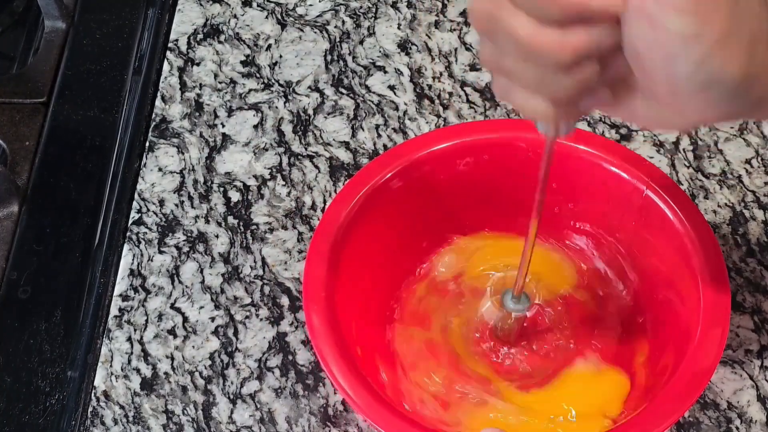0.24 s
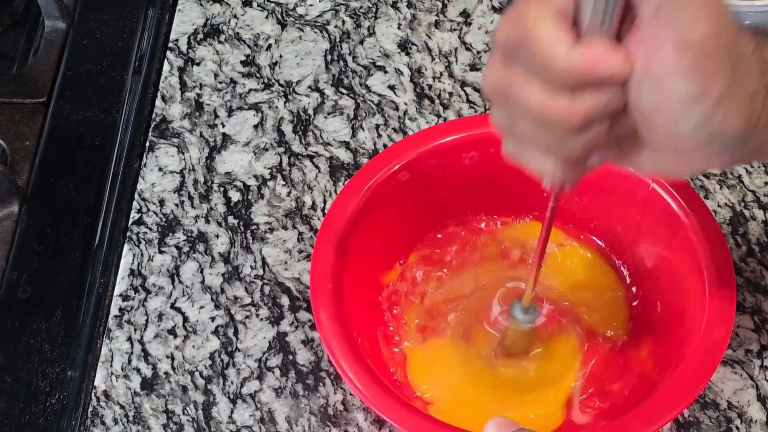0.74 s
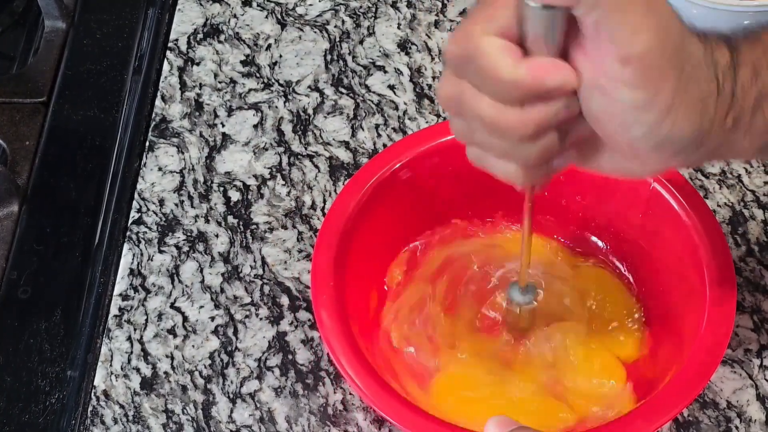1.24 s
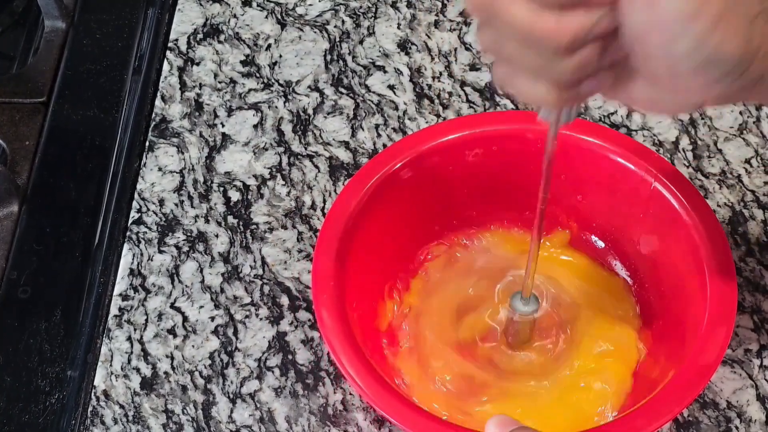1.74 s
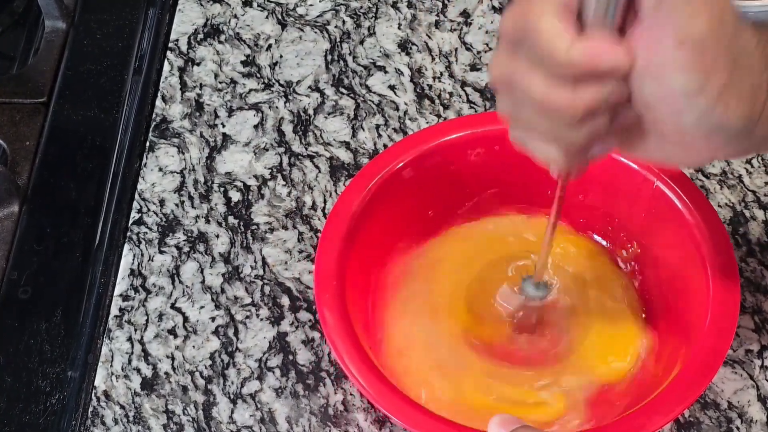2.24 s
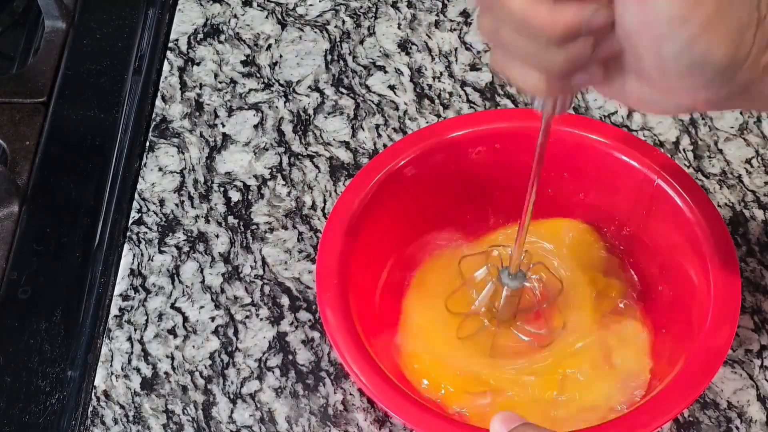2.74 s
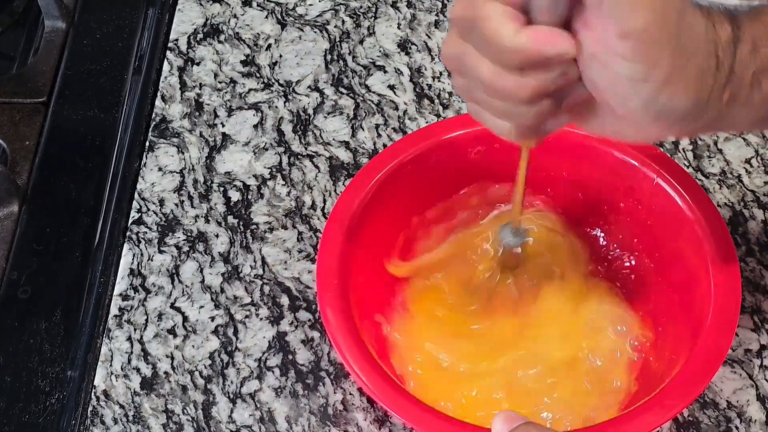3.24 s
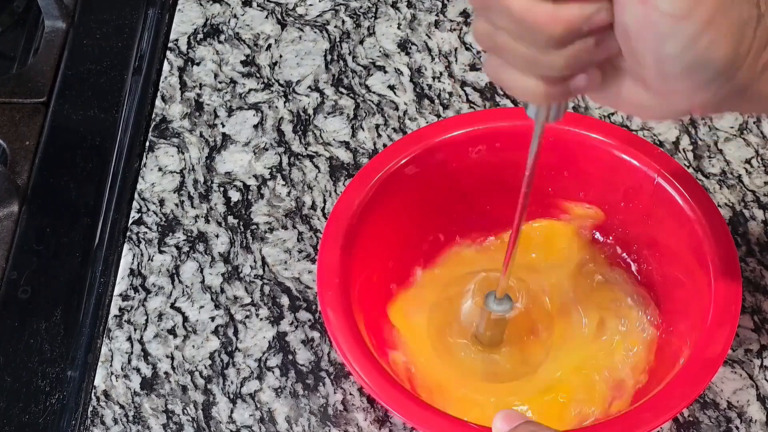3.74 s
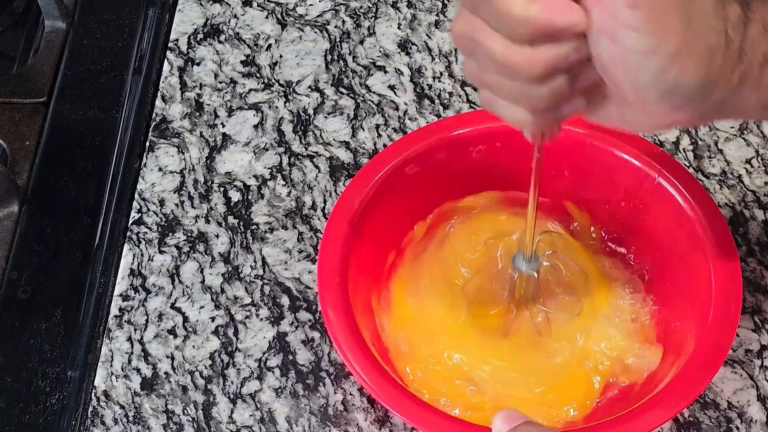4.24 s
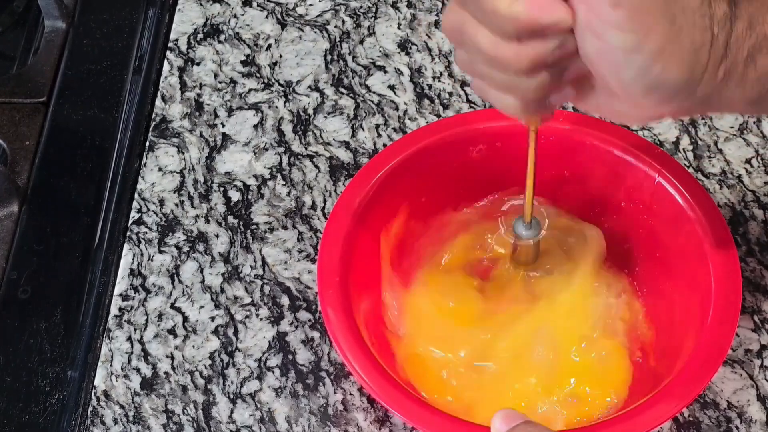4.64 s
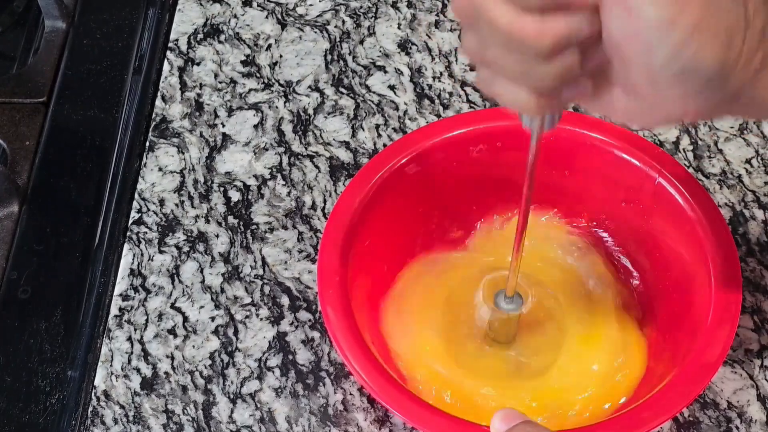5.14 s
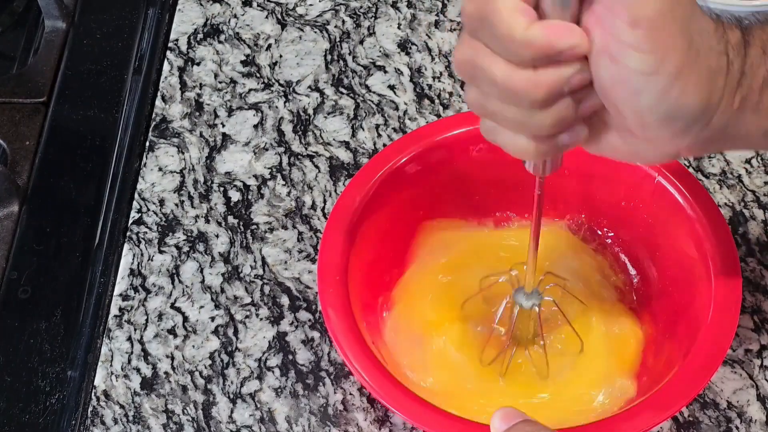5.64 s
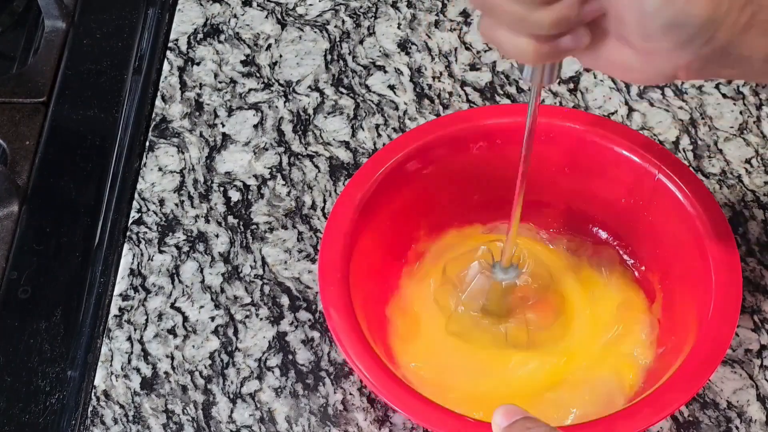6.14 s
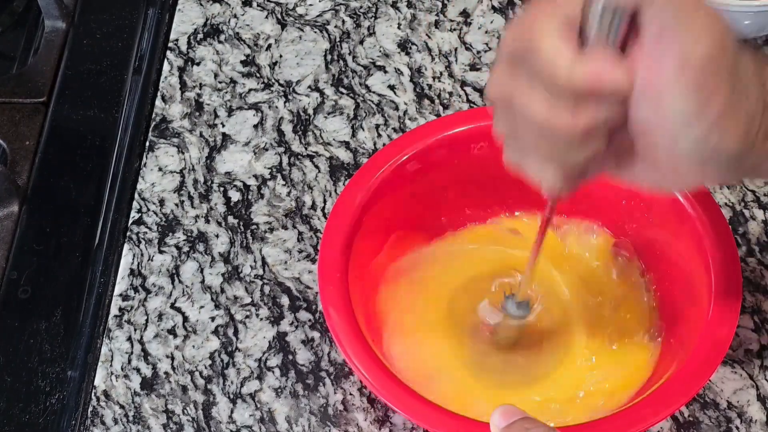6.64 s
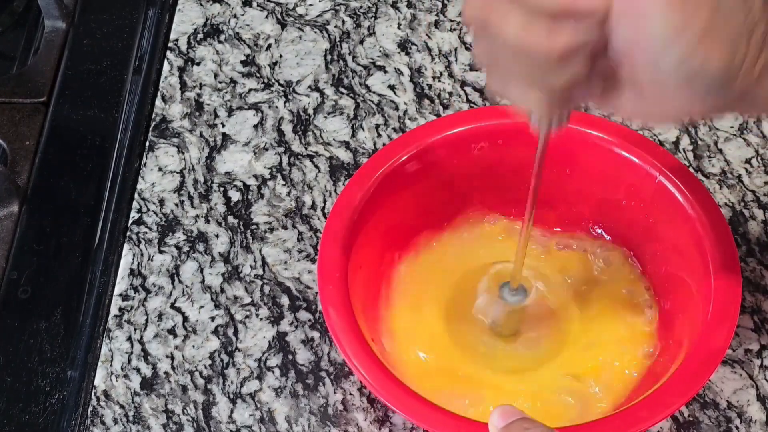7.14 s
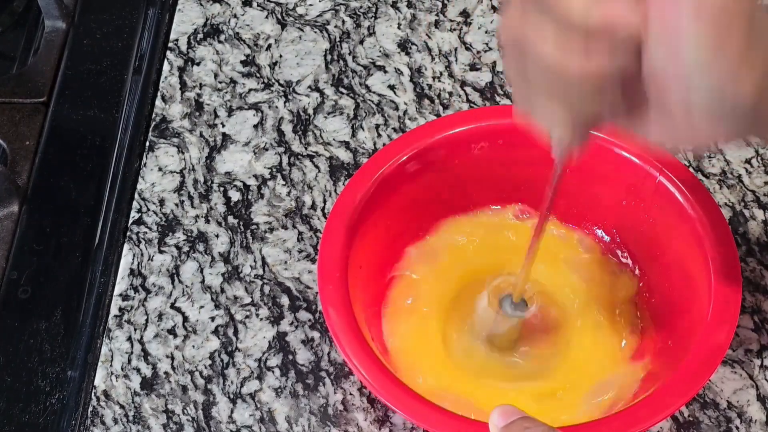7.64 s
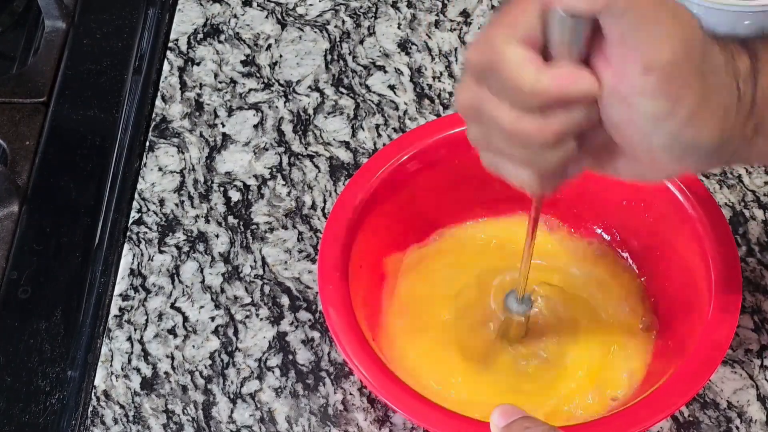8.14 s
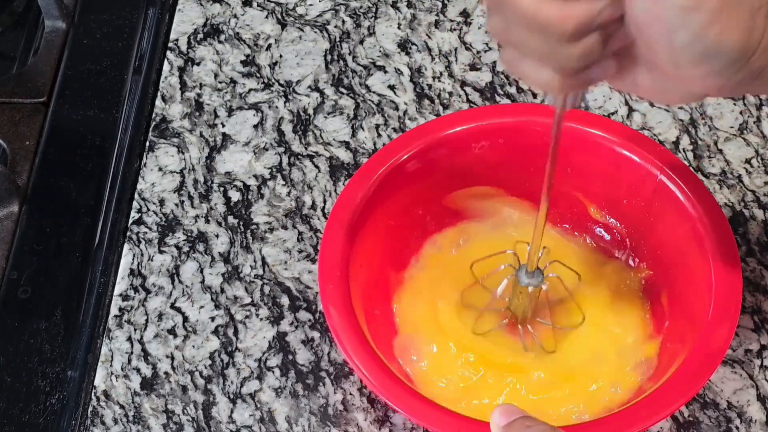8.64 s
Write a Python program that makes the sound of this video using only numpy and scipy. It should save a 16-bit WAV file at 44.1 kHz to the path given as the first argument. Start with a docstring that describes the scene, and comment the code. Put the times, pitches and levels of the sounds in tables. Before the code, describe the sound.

Close up in a small kitchen, a push-down whisk is pumped about five times a second in a plastic bowl of raw egg. Each stroke clacks and rattles its steel shaft, while wet slaps, gulps and hollow plastic rings follow unevenly. Occasional wire knocks and gritty scrapes break through, the hardest near the end with a slight squeal. Then the clatter grows lighter.

```python
"""Small kitchen: a push-down whisk is pumped about five times a second through raw eggs in a plastic bowl on stone.
Slaps and bare-wire knocks drive the bowl's decaying modes and filtered noise; gulps and clear bowl rings are
gliding sines. Each stroke clacks and rattles the steel spiral shaft through its own modes, with a tick before
the bottom. Drags scrape by stick-slip, the hub grinds out wavering tones, the bowl wobbles in low thuds, the egg
washes round. A short decaying-noise reverb rings around it all."""
import sys
import numpy as np
from scipy import signal
from scipy.io import wavfile
from scipy.ndimage import uniform_filter1d

SR = 44100
rng = np.random.default_rng(int(sys.argv[2]) if len(sys.argv) > 2 else 0)


def master_out(mix):
    """Clip the mix to full scale and print it as 16-bit PCM to the path in sys.argv[1]."""
    frames = np.transpose(np.atleast_2d(mix))
    ceiling = np.clip(frames, -1, 1)
    pcm = np.round(ceiling * 32767).astype(np.int16)
    wavfile.write(sys.argv[1], SR, pcm)


N = 392049

# All table levels are relative; each source sets its own gain.
# head slaps egg, a hollow collapses: start_s, level_db
EGG_SLAPS = [(0.011,-10),(.179,-9.5),(.226,-5.5),(.293,-6),(0.45,-6),(0.47,-3),(0.659,-5),(.882,-8),(.931,-5.5),(1.022,-3.5),(1.21,-10),(1.345,-5),(1.383,1.5),(1.456,-4.5),(1.556,-4),(1.605,-5),(1.638,-5.5),(1.758,-3.5),(1.804,1),(1.961,-7),(1.999,-5),(2.172,-14),(2.186,-1.5),(2.223,-3),(2.363,-7),(2.409,-3.5),(2.583,-5),(2.621,-5),(2.763,-9.5),(2.801,-1.5),(2.992,0.5),(3.185,-3),(3.714,-11.5),(3.751,-7.5),(3.795,-1),(3.863,-8.5),(4.025,-11.5),(4.11,-10.5),(4.149,-1.5),(4.185,-1),(4.562,-5),(4.977,-4.5),(5.213,-9),(5.361,-10.5),(5.395,-3),(5.448,-9),(5.662,-12),(5.742,-8.5),(5.879,-10),(5.958,-6),(5.994,0),(6.28,-3.5),(6.698,-11.5),(6.855,-10),(7.099,-8),(7.182,-4),(7.224,-3),(7.249,1),(7.385,-4.5),(7.504,-5.5),(7.593,-6.5),(8.096,-11),(8.32,-22.5),(8.435,-12.5),(8.522,-16),(8.866,-8.5)]
# modes of the filled bowl: mode_hz, level_db, t60_s
BOWL_MODES = [(369.5, 5, 0.05), (496, -2, 0.055), (620, -3, 0.11), (714, -4, 0.058), (807.2, -8, 0.17),
              (920, -14.5, 0.19), (955, -8.5, 0.083), (1368, -11.5, 0.061), (1488, 3, 0.014),
              (1663, -5, 0.04)]
# head strikes the bare bowl wall: start_s, knock_db, wire_ring_db
WALL_KNOCKS = [(2.993,-6,-13),(3.187,-2,-14.5),(4.559,1.5,-3.5),(4.977,-23,-9),(7.623,5,-4),(7.814,1.5,-26)]
# wire loops left shaking by a knock: mode_hz, level_db, t60_s
LOOP_MODES = [(3270,-2,.07),(3480,-2,.07),(3720,0,.09)]
# pushes of the handle: bottom_s, clack_db
HANDLE_STROKES = [(.0094,-3.5),(0.238,-3.5),(0.4856,-4.5),(0.7365,-6.5),(0.9177,-3.5),(1.1488,-1),(1.358,-1.5),(1.5866,0),(1.7846,-3),(2.005,-4.5),(2.204,-4.5),(2.4031,-1),(2.597,-9),(2.778,-7.5),(2.9761,-4),(3.1721,-3.5),(3.3673,-1),(3.574,-14.5),(3.7672,-11),(3.978,-11.5),(4.1625,-8),(4.378,-7),(4.542,-11),(4.7628,-6.5),(4.95,-9),(5.166,-6.5),(5.3702,-12.5),(5.573,-7),(5.7736,-3.5),(5.9667,-7),(6.18,-15.5),(6.387,-15),(6.593,-14.5),(6.7979,-11.5),(7.001,-11),(7.2016,-9),(7.4118,-10),(7.602,-5.5),(7.821,-26),(8.02,-23.5),(8.24,-24.5),(8.4635,-15),(8.6742,-17),(8.8725,-11)]
# briskness of the spring's return, interpolated: time_s, level_db
SPRING_LEVEL = [(0,-9),(1.5,-7),(2.4,-17),(3.9,-19),(5.1,-17.5),(6.3,-20.5),(7.4,-22.5),(8.89,-32)]
# modes of steel shaft and wires: mode_hz, level_db, t60_s
STEEL_MODES = [(1565,-6.5,0.042),(2380,-15.5,0.049),(2966,-10.5,0.063),(3280,-6,.03),(3903,-3,0.015),(4390,12,.018),(4673,5,0.017),(5740,8.5,.017),(6404,2,0.016)]
# wires drag hard along the bowl wall: start_s, end_s, level_db
WALL_DRAGS = [(2.197,2.266,-24),(3.014,3.08,-25.5),(4.575,4.671,-22),(5.954,6.044,-25.5),(7.199,7.33,-20.5),(7.616,7.75,-13.5)]
# hub grinds on the bowl floor: centre_s, level_db
HUB_GRINDS = [(1.141,-12.5),(1.578,-21),(3.579,-19),(3.966,-22),(5.155,-22),(5.59,-19.5),(5.77,-18.5)]
# bowl wobbles on the counter, one list a spell: time_s, level_db
WOBBLE_SPELLS = [
    [(.66, -33.5), (.82, -13), (1.08, -26), (1.18, -32.5)],
    [(2.45, -33.5), (2.55, -27), (2.7, -46)],
    [(4.1, -31), (4.33, -25.5), (4.65, -35.5)],
    [(5.88, -34.5), (6.12, -26.5), (6.45, -46)],
]
# short clear rings of the bowl, set off by clacks: start_s, level_db, pitch_hz
BOWL_RINGS = [(.008,-9,1472),(1.364,-7.5,1400),(1.995,-6,1555),(2.095,-12.5,1400),(2.203,-3.5,1657),(2.398,-6.5,1665),(2.975,-9.5,1433),(3.348,-14.5,1677),(3.37,-12.5,1030),(4.76,-32,1630),(4.771,-15.5,922),(5.57,-10,1337),(5.666,-13,1320),(7.411,-11.5,1550),(8.022,-20.5,1580)]

T = np.arange(N) / SR  # s
LEAD = SR // 12  # samples ahead of a stroke's centre
STROKE = np.arange(-LEAD, 3 * LEAD) / SR  # s about a stroke's centre

# slap pitch before scatter: at 0 dB, rise per dB, floor
SLAP_HZ, SLAP_HZ_PER_DB, SLAP_FLOOR_HZ = 686, 14.5, 473.7
# churn against its slap, and delay
CHURN_DB, CHURN_AFTER_S = -10.5, .012
# rattle against clack; top clack and running rasp against spring
RATTLE_DB, TOP_CLACK_DB, RUN_BACK_DB = -4.5, 1, -15
# top after bottom; hand's unevenness; rasp before the top
RETURN_AFTER_S, RETURN_JITTER_S, RUN_BACK_S = .098, .007, .045
# hardest drag: wire squeal and bright grating
SQUEAL_S, SQUEAL_LENGTH_S, SQUEAL_HZ = 7.625, 0.081, 6350
SQUEAL_DB, GRATE_DB = -27.5, -17


def bowl():
    """Slaps plop and ring the plastic, hard ones crack and thud; after each the head chatters and gulps air."""
    body, hard_blows = np.zeros((2, N))
    spin = swell(rise_s=0.027, fall_s=0.055)
    for s, db in EGG_SLAPS:
        # harder slaps ring higher
        pitch_hz = max(SLAP_HZ + SLAP_HZ_PER_DB * db, SLAP_FLOOR_HZ) * rng.uniform(.86, 1.12)
        blow = rebounds(gap_s=0.0077, loss_db=4, count=3)
        add(body, undb(db + 1) * plop(pitch_hz, fall_s=.009, glide_per_s=rng.uniform(-2, 11)), s)
        slap_ring = ring(blow, modes_near(pitch_hz), detune=.014, scatter_db=5.0)
        add_stroke(body, undb(db + 13) * slap_ring, s)
        add_stroke(hard_blows, undb(1.72 * db) * blow, s)  # expands the dynamics
        contacts = spin * taps(len(STROKE), rate_hz=170, scatter_db=7.0)
        chatter = undb(-4.5) * ring(contacts, modes_near(pitch_hz), detune=0.022, scatter_db=4.5)
        gulps = undb(6) * pings(spin, pitch_hz, spread=0.2386, cycles=5.54, glide_per_s=5, count=9)
        add_stroke(body, undb(CHURN_DB + db) * (chatter + gulps), s + CHURN_AFTER_S)
    crack = undb(7.0) * band(slide(hard_blows, decay_s=0.025), 1000, 2200)
    thud = undb(24.5) * band(slide(hard_blows, decay_s=.025), 156, 361, order=4)
    return band(body, 287, 1520, order=3) + crack + thud


def modes_near(pitch_hz):
    """The place of contact favours bowl modes near one pitch: 9 dB down per octave, at most 9 dB."""
    return [(hz, db - 9 * min(abs(np.log2(hz / pitch_hz)), 1), t60) for hz, db, t60 in BOWL_MODES]


def knocks():
    """Bare wire cracks on the plastic and rebounds; the loops go on rattling against each other."""
    crack, loops = np.zeros((2, N))
    for s, knock_db, wires_db in WALL_KNOCKS:
        blow = rebounds(gap_s=.007, loss_db=3.5, count=4)
        add_stroke(crack, undb(knock_db) * slide(blow, decay_s=.008), s)
        shaking = swell(rise_s=.001, fall_s=.08) * taps(len(STROKE), rate_hz=110, scatter_db=4.5)
        loop_ring = ring(shaking, LOOP_MODES, detune=.012, scatter_db=2.5)
        add_stroke(loops, undb(wires_db - 19) * loop_ring, s)
    return undb(27.5) * band(crack, 560, 1560) + loops


def shaft():
    """The spiral rasps through its nut and clacks at the turn; the wires tick together."""
    steel, rubbing, ticks = np.zeros((3, N))
    upper_modes = [mode for mode in BOWL_MODES if mode[0] > 1200]
    for s, clack_db, rattle in reversals():
        blow = undb(clack_db + 10.5) * rebounds(gap_s=0.0056, loss_db=4.5, count=3)
        push = blow + undb(-8.5) * rattle * taps(len(STROKE), rate_hz=170, scatter_db=6)
        # free length retunes the shaft at each turn
        add_stroke(steel, ring(push, STEEL_MODES, detune=0.06, scatter_db=8.0), s)
        # jolt runs down the shaft into the bowl
        add_stroke(steel, undb(-3.5) * ring(push, upper_modes, detune=0.032, scatter_db=10.0), s)
        add_stroke(rubbing, push, s)
        # other wires meet at each turn, so the ticks change colour
        wire_hz = 4882 * np.exp(0.185 * np.clip(rng.standard_normal(), -2, 2))
        wire_ticks = pings(rattle, wire_hz, spread=0.1662, cycles=14.3, glide_per_s=0, count=80)
        add_stroke(ticks, undb(-3.0) * wire_ticks, s)
    rub = undb(-1.5) * band(slide(rubbing, decay_s=.017), 2460, 4880)
    return undb(0.5) * steel + band(ticks, 2200, 5670) + rub


def reversals():
    """Clack at the bottom, spring run-back, clack at the top: rows of time_s, clack_db, rattle envelope (gain)."""
    spin = swell(rise_s=0.013, fall_s=0.015)
    running = (STROKE < 0) & (STROKE > -RUN_BACK_S)
    rows = []
    for (s, clack_db), late in zip(HANDLE_STROKES, rng.uniform(-0.91, 1, len(HANDLE_STROKES))):
        spring_db = spring_level_db(s)
        rasp = undb(spring_db) * (undb(RATTLE_DB) * spin + undb(RUN_BACK_DB) * running)
        top_s = s + RETURN_AFTER_S + RETURN_JITTER_S * late
        rows.append((s, clack_db, undb(clack_db + RATTLE_DB) * spin))
        rows.append((top_s, spring_db + TOP_CLACK_DB, rasp))
    return rows


def spring_level_db(s):
    """Briskness of the spring's return at s seconds."""
    return np.interp(s, *np.transpose(SPRING_LEVEL))


def catches():
    """The nut catches the spiral with a bright two-mode tick 24 ms before each bottom."""
    out = np.zeros(N)
    modes = [(5650, -1.5, 0.041), (4300, -1.5, 0.019)]  # mode_hz, level_db, t60_s
    for s, _ in HANDLE_STROKES:
        tick = ring(rebounds(gap_s=0.0042, loss_db=7.0, count=3), modes, detune=0.028, scatter_db=2.0)
        add_stroke(out, undb(spring_level_db(s) + 7) * tick, s - .024)
    return out


def drag():
    """Wires bite into the plastic, then stick and slip in a gritty, fading scrape; the hardest one squeals."""
    pressure = np.zeros(N)
    for start_s, end_s, db in WALL_DRAGS:
        fading = undb(db - 54 * np.clip(T - start_s, 0, 1))  # 54 dB/s
        pressure += fading * ((T > start_s) & (T < end_s))
    slips = taps(N, rate_hz=480, scatter_db=4.5)
    scratch = slide(slips, decay_s=.002)
    grit = undb(3.5) * unit(band(scratch, 850, 1620, order=1))
    body = grit + undb(2) * unit(ring(slips, BOWL_MODES, detune=0.023, scatter_db=7.3))
    held = (T > SQUEAL_S) * np.exp(-np.maximum(T - SQUEAL_S - SQUEAL_LENGTH_S, 0) / 0.015)
    squeal = undb(SQUEAL_DB) * unit(band(slips, SQUEAL_HZ, SQUEAL_HZ + 220))
    grate = undb(GRATE_DB) * unit(band(scratch, 1470, SQUEAL_HZ))
    return uniform_filter1d(pressure, LEAD // 30) * band(body, 290, 4500) + held * (squeal + grate)


def grind():
    """Stick and slip under the hub draws three brief, wavering tones from the bowl."""
    out = np.zeros(N)
    for s, level_db in HUB_GRINDS:
        tones = (350, level_db), (945, level_db - 9.5), (rng.uniform(1330, 1650), level_db - 10.5)
        for hz, db in tones:
            waver, grip = (unit(band(noise, 7.9, 99)) for noise in rng.standard_normal((2, len(STROKE))))
            phase = 2 * np.pi * np.cumsum(hz * (1 + 0.054 * waver)) / SR
            tone = unit(np.sin(phase) * undb(2.6 * grip))
            add_stroke(out, undb(db) * np.exp(-(STROKE / 0.025) ** 2) * tone, s)
    return out


def clear_rings():
    """The bowl rings briefly, rising very slightly in pitch."""
    out = np.zeros(N)
    for s, db, hz in BOWL_RINGS:
        add(out, undb(db) * plop(hz, fall_s=0.012, glide_per_s=0.91), s)
    return out


def wobble():
    """The bowl's foot bumps on the stone in uneven, hollow thuds."""
    level = np.zeros(N)
    for spell in WOBBLE_SPELLS:
        level += undb(np.interp(T, *np.transpose(spell), left=-120, right=-120))
    thuds = pings(np.ones(N), 154.5, spread=.28, cycles=2, glide_per_s=0, count=500)
    return level * unit(band(thuds, 118.6, 300, order=4))


def swirl():
    """The egg keeps circling with a faint wash, more quietly as it blends."""
    contacts = taps(N, rate_hz=240, scatter_db=3.0)
    wash = band(slide(contacts, decay_s=0.0044), 280, 3300, order=1)
    return undb(np.interp(T, [0, T[-1]], [-38, -41])) * unit(wash)


def kitchen(direct):
    """Short room ring: noise decaying with a t60 of 0.3 s, from 5 ms on."""
    t = T[:SR // 2]
    tail = rng.standard_normal(len(t)) * undb(-60 * t / .3) * (t > .005)
    return undb(-7.5) * signal.oaconvolve(direct, tail / np.linalg.norm(tail))[:N]


def undb(db):
    """Decibels to gain."""
    return 10 ** (np.asarray(db) / 20)


def unit(x):
    """Scale to rms 1."""
    return x / np.sqrt(np.mean(x ** 2) + 1e-18)


def band(x, lo_hz, hi_hz, order=2):
    """Band-pass filter."""
    sos = signal.butter(order, [lo_hz, min(hi_hz, .45 * SR)], "band", fs=SR, output="sos")
    return signal.sosfilt(sos, x + 1e-18)


def add(track, sound, s):
    """Mix a sound into a track, starting at s seconds."""
    start = int(s * SR)
    lo, hi = max(start, 0), min(start + len(sound), len(track))
    if hi > lo:
        track[lo:hi] += sound[lo - start:hi - start]


def add_stroke(track, sound, s):
    """Mix in a sound laid out on STROKE, its zero at s seconds."""
    add(track, sound, s + STROKE[0])


def ring(push, modes, detune, scatter_db):
    """Drive a body's decaying modes; each call shifts them a little and weights them anew."""
    hz, db, t60 = np.transpose(modes)[:, :, None]
    shift, weight, side = rng.standard_normal((3, len(modes), 1))
    t = T[:LEAD]
    waves = np.sign(side) * np.sin(2 * np.pi * hz * (1 + detune * shift) * t)
    decay = undb(db + scatter_db * np.clip(weight, -1, 1) - 60 * t / t60)
    response = np.sum(decay * waves, axis=0)
    return signal.fftconvolve(push, response / np.linalg.norm(response))[:len(push)]


def swell(rise_s, fall_s):
    """Exponential build-up to the stroke and run-down after it."""
    return np.exp(np.minimum(STROKE / rise_s, -STROKE / fall_s))


def taps(size, rate_hz, scatter_db):
    """Uneven contact impulses at about rate_hz, at rms 1."""
    chance = rng.standard_normal((size // 40, 2))
    at = np.cumsum(np.exp(chance[:, 0] / 2)) * SR / rate_hz
    force = undb(scatter_db * np.clip(chance[:, 1], -2, 2))
    # taps past the end share one bin, then dropped
    return unit(np.bincount(np.minimum(at, size).astype(int), force, size + 1)[:size])


def rebounds(gap_s, loss_db, count):
    """A blow at the stroke's centre and its weaker rebounds."""
    gaps_s = gap_s * (1 + rng.uniform(-0.26, .5, count))
    at = LEAD + SR * (np.cumsum(gaps_s) - gaps_s[0])
    return np.bincount(at.astype(int), undb(-loss_db * np.arange(count)), len(STROKE))


def slide(push, decay_s):
    """Smear each contact into a short hiss of equal energy."""
    keep = np.exp(-2 / (decay_s * SR))
    power = signal.lfilter([1 - keep], [1, -keep], push ** 2 + 1e-18)
    return np.sqrt(power) * rng.standard_normal(len(push))


def pings(spin, hz, spread, cycles, glide_per_s, count):
    """Short ringing grains scattered in pitch about hz, as strong as the spin at their moment."""
    out = np.zeros(len(spin))
    t = T[:int(5 * cycles / hz * SR)]
    starts = rng.integers(0, len(spin), count)
    pitches_hz = hz * np.exp(spread * rng.standard_normal(count))
    for at, pitch_hz in zip(starts, pitches_hz):
        if spin[at] > .01:
            wave = np.sin(2 * np.pi * pitch_hz * t * (1 + glide_per_s * t))
            add(out, spin[at] * wave * np.exp(-pitch_hz * t / cycles), at / SR)
    return out


def plop(hz, fall_s, glide_per_s):
    """A sine swells fast, dies away exponentially and glides in pitch."""
    t = T[:LEAD]
    wave = np.sin(2 * np.pi * hz * t * (1 + glide_per_s * t))
    return wave * (1 - np.exp(-t / 0.0012)) * np.exp(-t / fall_s)


def scene():
    """All sources plus the kitchen's ring, one channel."""
    direct = bowl() + knocks() + shaft() + catches() + drag() + grind() + clear_rings() + wobble() + swirl()
    return (direct + kitchen(direct))[None]


def record(dry):
    """Steep low-pass at 7450 Hz, clip at 0.68, high-pass at 90 Hz, low-pass again."""
    top = signal.butter(18, 7450, fs=SR, output="sos")
    bass_cut = signal.butter(4, 90, "high", fs=SR, output="sos")
    clipped = np.clip(signal.sosfilt(top, dry), -.68, .68)
    return signal.sosfilt(top, signal.sosfilt(bass_cut, clipped))


dry = scene()
out = record(dry)
master_out(out)
```